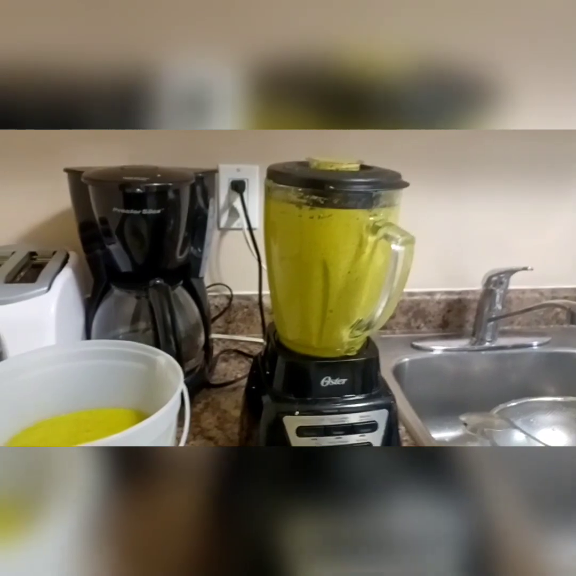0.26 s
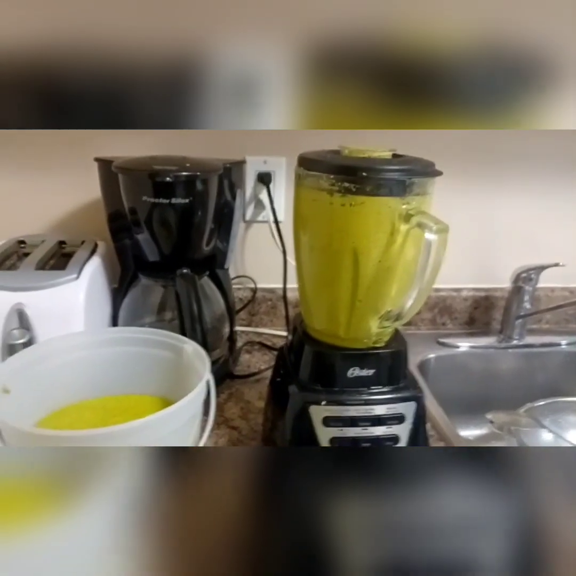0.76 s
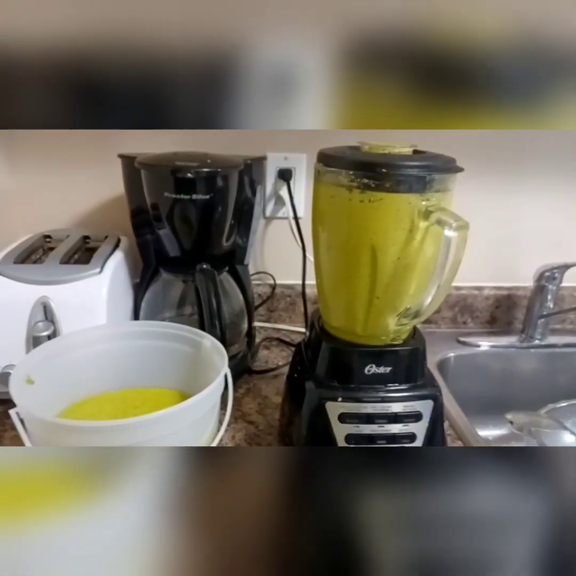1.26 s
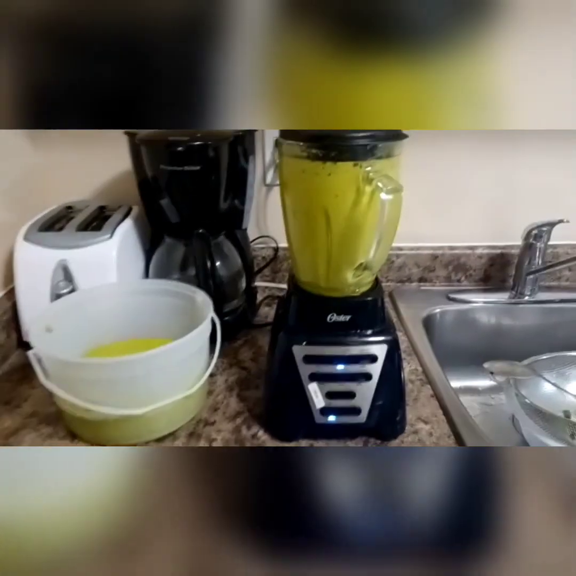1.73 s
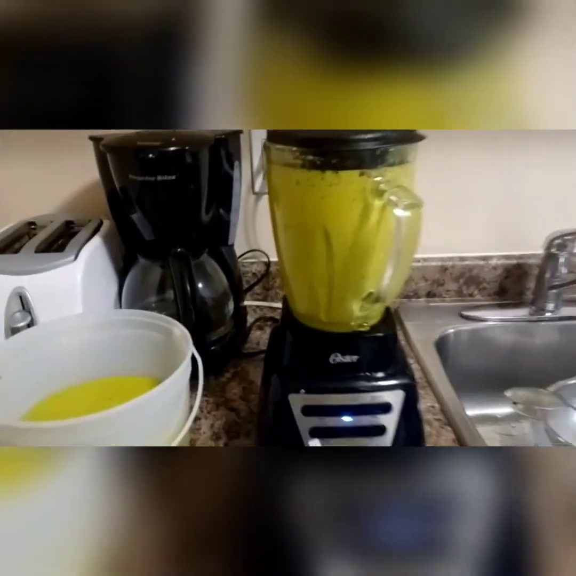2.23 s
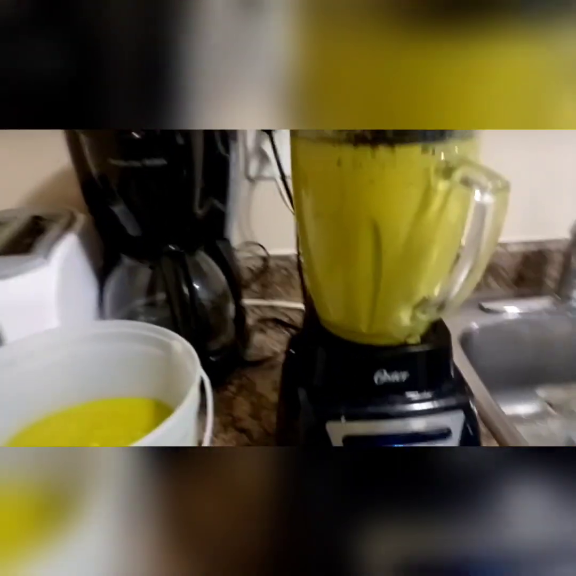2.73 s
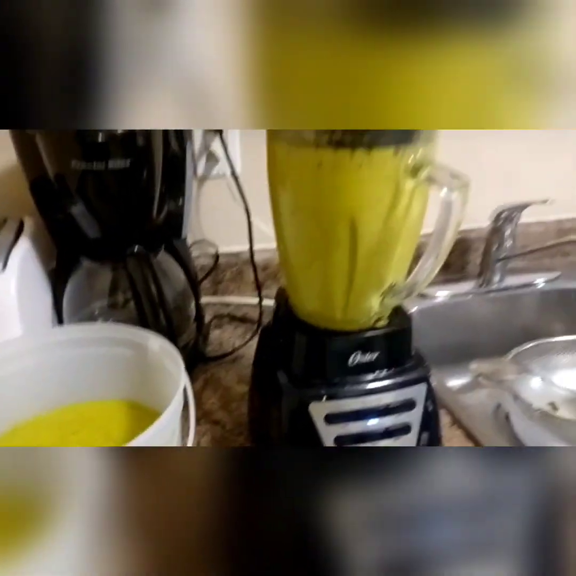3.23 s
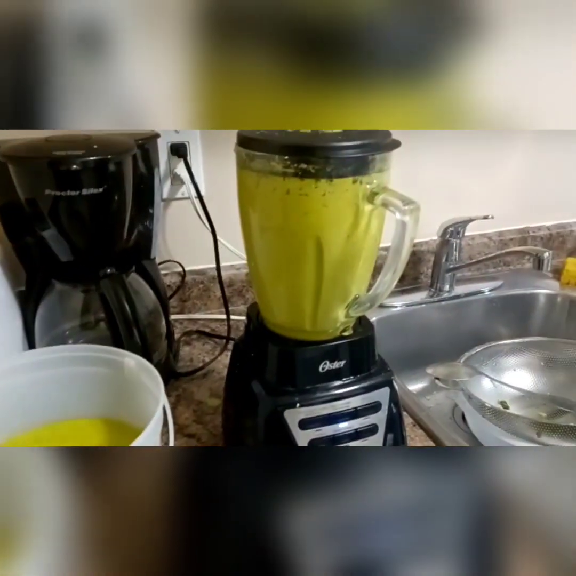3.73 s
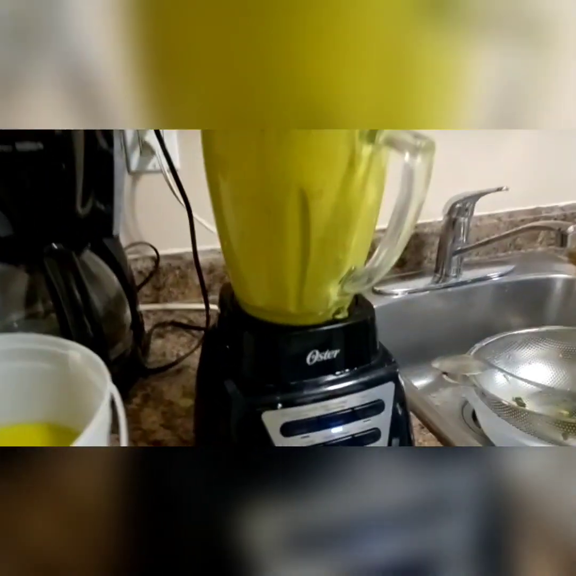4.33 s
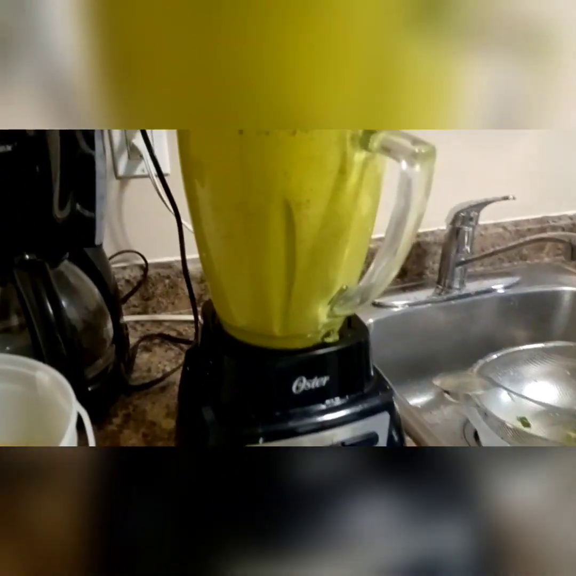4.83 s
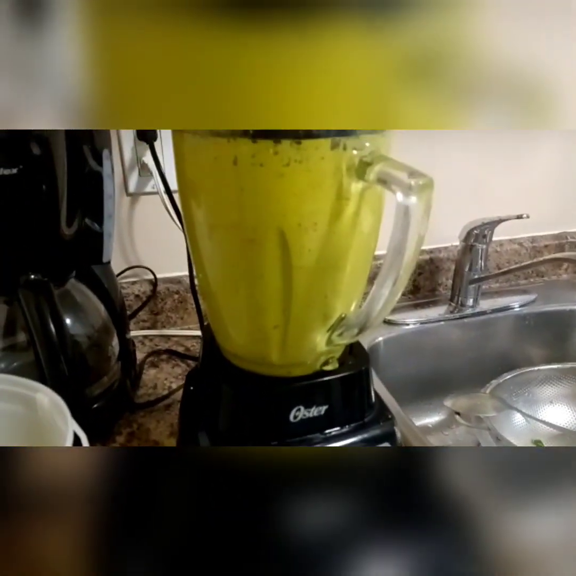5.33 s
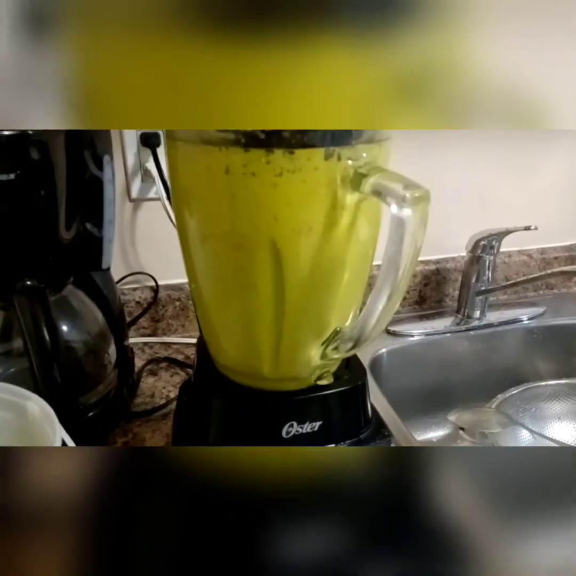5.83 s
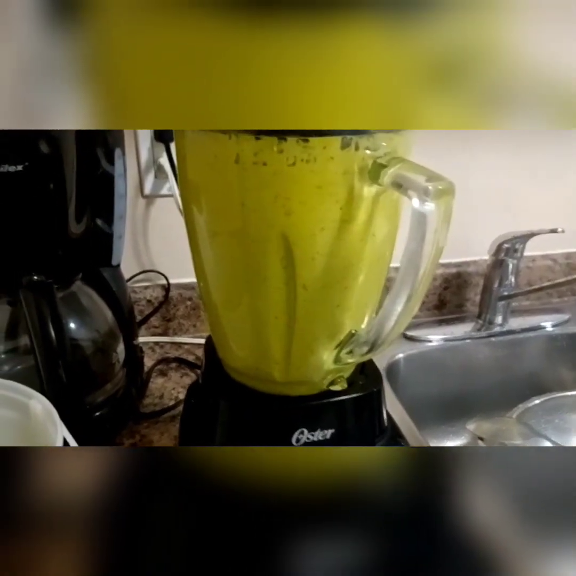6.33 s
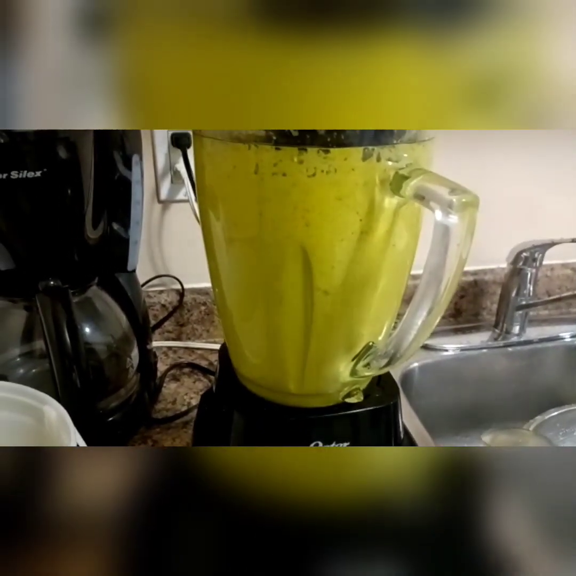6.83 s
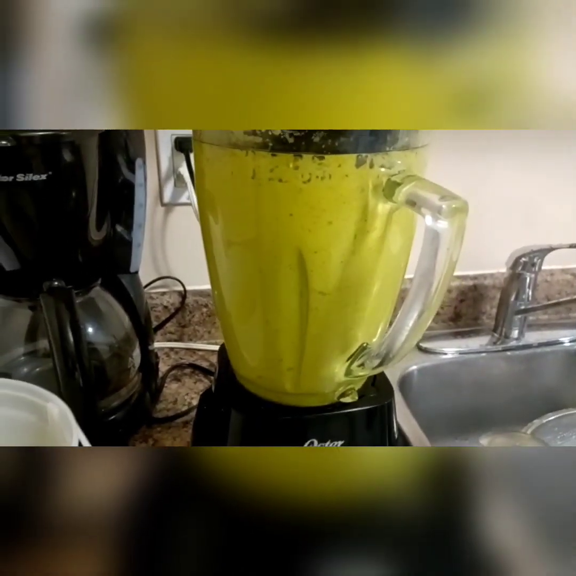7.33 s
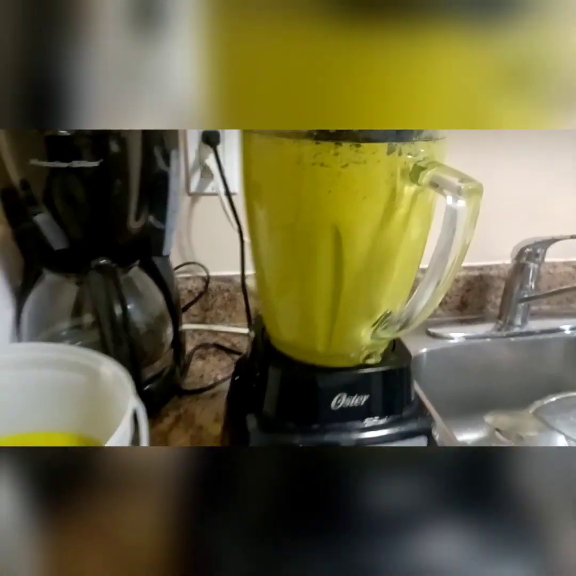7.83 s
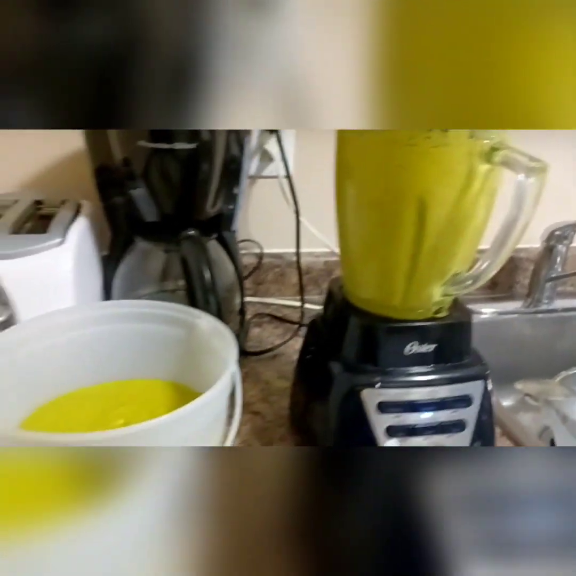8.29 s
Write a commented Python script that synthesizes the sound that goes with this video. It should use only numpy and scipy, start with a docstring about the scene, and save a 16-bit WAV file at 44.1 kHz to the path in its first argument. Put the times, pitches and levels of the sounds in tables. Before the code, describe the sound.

A blender, heard close in a home kitchen, runs in short bursts after a moment of faint appliance hum and a soft button tick. About once a second the motor spins up with an electric hum, a hissing whine and fast knocking, sloshes through thick puree, then winds down. Every other pulse runs faster. A few hard clacks and dull lump thumps come later, and the eighth pulse breaks off while spinning up.

```python
"""A quiet kitchen murmurs; a button ticks and a blender, heard close, starts on a jar of thick puree.
Power comes on: the motor field hums at twice the mains, the drive coupling chatters, then knocks once a turn.
As speed builds, the brushes hiss and whine and the blades thump through the puree, ringing the jar.
Power drops and the motor coasts down, at times with a thin squeak. Pulses follow a second apart, forward
and reverse in turn, with a few clacks and caught lumps later on; the eighth is cut short as it spins up."""
import sys
import numpy as np
from scipy import signal
from scipy.fft import rfft, irfft, next_fast_len
from scipy.io import wavfile
from scipy.ndimage import uniform_filter1d

SR = 44100
rng = np.random.default_rng(int(sys.argv[2]) if len(sys.argv) > 2 else 0)


def put_to_file(sound):
    """Save the sound as 16-bit audio at rate SR, in the file named by the first command-line argument."""
    columns = np.atleast_2d(sound).T  # one column per channel
    safe = np.clip(columns, -1, 1)
    whole_steps = np.round(safe * 32767)
    wavfile.write(sys.argv[1], SR, whole_steps.astype(np.int16))


N = 377363
T = np.arange(N) / SR
HUM_HZ = 120  # twice the mains: the rate of the torque ripple
CYCLE_START_S, CYCLE_S, COAST_S = 1.33, 1.0, .62  # the motor coasts from COAST_S into each cycle
SLACK_S = .008  # power comes on this long before the coupling chatters


def undb(db):
    """Gain of a dB value."""
    return 10 ** (np.asarray(db) / 20)


def unit(x):
    """Scale to rms 1."""
    return x / np.sqrt(np.mean(x ** 2))


def even(x, reverse):
    """Rms 1 in each direction of drive."""
    return x / np.where(reverse, x[..., reverse].std(), x[..., ~reverse].std())


def noise():
    """Two unrelated white noises, for mid and side."""
    return rng.standard_normal((2, N))


def walk(rate_hz):
    """Random modulator of rms 1, gliding to a new value rate_hz times a second."""
    k = int(SR / rate_hz)
    return unit(uniform_filter1d(np.repeat(rng.standard_normal(N // k + 1), k), k)[:N])


def colour(x, points):
    """EQ through (f/Hz, gain/dB) points."""
    hz, db = np.transpose(points)
    size = next_fast_len(N)
    gain = undb(np.interp(np.log(np.arange(size // 2 + 1) * SR / size + 1), np.log(hz), db))
    return irfft(rfft(x, size) * gain, size)[..., :N]


def ring(x, hz, width_hz):
    """One resonance, gain 1 at its centre."""
    return signal.lfilter(*signal.iirpeak(hz, hz / width_hz, SR), x)


def body(x, modes, reverse):
    """Resonator bank; each direction of drive weights the modes its own way."""
    return sum(ring(x, hz, width) * undb(np.where(reverse, back_db, fore_db)) * (-1) ** k
               for k, (hz, width, fore_db, back_db, *_) in enumerate(modes))


def burst(strikes, decay_s):
    """Every strike opens a decaying envelope."""
    return signal.lfilter([1], [1, -np.exp(-1 / (decay_s * SR))], strikes)


def triggers(count, scatter_db):
    """A strike of random size whenever the count crosses a whole number."""
    return np.append(0, np.diff(np.floor(count))) * undb(scatter_db * rng.standard_normal(N))


def hits(cues):
    """One impulse for each (t/s, level/dB) cue."""
    strikes = np.zeros(N)
    for s, db in cues:
        strikes[int(s * SR)] = undb(db)
    return strikes


# room tone spectrum: f/Hz, relative level/dB
ROOM_TONE = [(29, -18), (50, -2.5), (82, -10.5), (180, -5.5), (546, -17), (582, -26), (724, -18),
             (1090, -28.5), (9000, -47.5), (11700, -78), (19800, -120)]
# fridge compressor lines: f/Hz, level/dB
FRIDGE_LINES = [(59.2, -101), (118.4, -77.5), (177.6, -85.5), (236.9, -84)]
def kitchen(murmur_db=-70.5):
    """The bed: a low murmur of appliances and the drone of a fridge compressor."""
    murmur = unit(colour(noise(), ROOM_TONE)) * undb(murmur_db + 2 * walk(23))
    return murmur + sum(np.sqrt(2) * undb(db) * np.sin(2 * np.pi * hz * T) for hz, db in FRIDGE_LINES)


def button(at_s=1.28, decay_s=.004, hz=980, width_hz=1100):
    """One soft, dull tick as the button is pressed."""
    press = undb(-52) * (T > at_s) * np.exp(-np.abs(T - at_s) / decay_s)
    return ring(ring(press * noise(), hz, width_hz), hz, width_hz)


# shaft speed over a cycle: t/s, forward speed/(turns/s), reverse speed/(turns/s)
SPEED_CURVE = [(0, 12, 12), (.12, 40, 44), (.19, 48.5, 51), (.26, 55.5, 62), (.33, 56.3, 70.5),
               (.42, 54.3, 72.4), (.5, 52.8, 73.5), (.61, 51.8, 73.5), (.65, 47, 57), (.72, 38, 41),
               (1, 8, 12)]
def shaft_speed(cycle_t, reverse):
    """The motor spins up, holds and coasts; it runs faster in reverse."""
    at, fore, back = np.transpose(SPEED_CURVE)
    return np.where(reverse, np.interp(cycle_t, at, back), np.interp(cycle_t, at, fore))


# cue sheet, a row a pulse: chatter t/s, full hum/dB, soft-start hum/dB, hum dip t/s into the cycle,
# churn/dB, rattle/dB, rattle tail trim/dB, chatter drive/dB, chatter length/s, coupling seat/0-1,
# knock/dB re hiss, whine trim/dB, upper whine trim/dB, whistle/dB re rattle
PULSE_CUES = [(1.4034, -21, -28.5, 0.14, -31, -37.5, 24, -43, 0.019, 1, -6.5, 1, -5, -19),
              (2.334, -29, -30, 0.16, -25.5, -36, -1, -27, 0.055, 0, -3, 2.5, -1, -30),
              (3.3313, -21, -26.5, .12, -29.5, -37, 5, -22, 0.034, 0.47, -4, -3.5, 11, -14),
              (4.335, -26.5, -31, 0.21, -24.5, -35.5, 7, -33.5, 0.013, 0, -5, -4.5, .1, -25),
              (5.333, -18, -24.5, .1, -29.5, -36, -13, -21.5, 0.034, 1, -5.5, 3.5, -5, -18),
              (6.33, -27, -37.5, 0.23, -25, -36, -4.5, -22.5, 0.032, .35, -6.5, 2, -3, -26),
              (7.333, -18.5, -28, 0.052, -29, -37, -7, -35, 0.029, 0.5, -8.5, 3, -6, -16),
              (8.33, -37, -33, 0.23, -26, -40, -7, -32.5, 0.0085, .2, -2, 3, 4, -26)]
# envelopes over a cycle, one for each direction: t/s, hum trim/dB, churn trim/dB, rattle trim/dB
FORWARD_ENVELOPE = [(.02, -0.8, -10, -10.5), (.1, 0.5, -7.5, -7.5), (.26, 0.7, 0.64, 0.06),
                    (0.599, 0.1, -3, -2.05), (.68, -19.5, -12.5, -10.5), (.86, -43.5, -36.5, -34),
                    (1, -53, -52, -50.5)]
REVERSE_ENVELOPE = [(.02, -1.5, -19, -10.5), (.07, -1.8, -13.5, -13.5), (.2, -1, -7.5, -4),
                    (.33, -1.2, 0.3, -0.36), (.59, -1, -0.1, -1.6), (.68, -13.5, -8, -9),
                    (.8, -24, -21.5, -16.5), (.96, -40, -45, -32.5), (1, -31, -37, -34)]
def faders(pulse, cycle_t, reverse, attacks_s=(.025, .011, .0047)):
    """Hum, churn and rattle levels in dB: every pulse swells, holds and dies away."""
    chatter_s, full_db, soft_db, dip_s, churn_db, rattle_db, tail_db = np.array(PULSE_CUES)[pulse, :7].T
    soft_start = np.interp(cycle_t, (.11, .28), (0, 1))
    # the hum dips as the blades gather speed
    dip_db = np.where(reverse, -17.5, -2.5) * np.exp(-((cycle_t - dip_s) / .03) ** 2)
    hum_db = soft_db + (full_db - soft_db) * soft_start + dip_db
    rattle_db = rattle_db + tail_db * np.interp(cycle_t, (.9, 1), (0, 1))
    powered_s = np.maximum(T + SLACK_S - chatter_s, 0)
    fore_t, *fores = np.transpose(FORWARD_ENVELOPE)
    back_t, *backs = np.transpose(REVERSE_ENVELOPE)
    levels = []
    for db, fore, back, attack_s in zip((hum_db, churn_db, rattle_db), fores, backs, attacks_s):
        shape_db = np.where(reverse, np.interp(cycle_t, back_t, back), np.interp(cycle_t, fore_t, fore))
        onset_db = 20 * np.log10(1e-5 + 1 - np.exp(-(powered_s / attack_s) ** 2))
        levels.append(db + shape_db + onset_db)
    return levels


# hum overtones: multiple of HUM_HZ, level/dB re churn
HUM_OVERTONES = [(2, -10), (3, -20.5), (4, -38), (5, -13.5)]
def field_hum(hum_db, churn_db, turns, reverse):
    """The motor field hums at twice the mains, wavering more in reverse."""
    phase = 2 * np.pi * HUM_HZ * T
    waver_db = np.where(reverse, 2, .6) * walk(25)
    root = np.sqrt(2) * undb(hum_db + waver_db) * np.sin(phase + .013 * np.sin(2 * np.pi * turns))
    overtones = sum(undb(db + 4.1 * walk(15)) * np.sin(k * phase + k) for k, db in HUM_OVERTONES)
    return root + undb(churn_db) * overtones


def unbalance(turns, speed, reverse):
    """The unbalanced shaft throbs with a force that grows with the square of speed."""
    root = undb(np.where(reverse, -11, -14)) * np.sin(2 * np.pi * turns)
    octave = undb(np.where(reverse, -16, -4) + 5.5 * walk(20)) * np.sin(4 * np.pi * turns)
    return (speed / 70) ** 2 * (root + octave)


# coupling and housing modes: f/Hz, width/Hz, forward hiss/dB, reverse hiss/dB,
# knock on seat 0/dB, knock on seat 1/dB
HOUSING_MODES = [(1415, 75, -11, 0.5, -25, -24), (1913, 360, -4.5, -1, -20, -14),
                 (2185, 205, 0, 2.5, -2, -0.5), (2640, 730, -9.5, -5.5, -15, -20),
                 (3660, 460, -6, -3, -8, -10.5), (4116, 410, -7, -4, -4, -6),
                 (4820, 317, -7.5, -3, -2.5, -2.5), (5270, 154, -5, -2.5, -13.5, -3),
                 (6050, 460, -9, -8.5, -17, -15), (7220, 280, -13.5, -13, -42, -17),
                 (7630, 180, -20, -18, -34, -30), (11560, 340, -20, -22.5, -28, -39),
                 (12340, 130, -9.5, -9.5, -20, -27), (12930, 4900, -22.5, -20.5, -28, -35)]
def coupling_hit(strikes, seat=0):
    """A sharp blow and a short scrape ring the coupling; how it is seated sets the tone."""
    blow = np.array([strikes, np.roll(strikes, shift=17)])  # second path a little longer
    contact = blow + .09 * burst(strikes, decay_s=.003) * noise()
    return sum(ring(ring(contact, hz, 2 * width), hz, width) * undb(db0 + (db1 - db0) * seat)
               for hz, width, _, _, db0, db1 in HOUSING_MODES)


def chatter(gain_db=28):
    """At switch-on the torque ripple drums a short, fading roll on the coupling."""
    strikes = np.zeros(N)
    roll_t = np.arange(0, .08, 1 / HUM_HZ)
    for s, db, length_s in np.array(PULSE_CUES)[:, [0, 7, 8]]:
        strikes[((s + roll_t) * SR).astype(int)] += undb(db) / (1 + (roll_t / length_s) ** 6)
    return undb(gain_db) * coupling_hit(strikes)


def rattle(turns, reverse, knock_db, seat):
    """The coupling knocks once a turn and the brushes hiss, both harder as the torque ripple peaks."""
    torque = np.cos(2 * np.pi * HUM_HZ * T)
    blows = triggers(turns + .02 * walk(70), scatter_db=1.5)
    knock = coupling_hit(blows * undb(np.where(reverse, 2.5, .8) * torque), seat)
    hiss = body(undb(.96 * torque + 2.1 * walk(50)) * noise(), HOUSING_MODES, reverse)
    return even(hiss, reverse) + undb(knock_db) * even(knock, reverse)


# commutator partials: multiple of shaft speed, forward weight/dB, reverse weight/dB
WHINE_PARTIALS = [(35.8, -11.5, -12.5), (111.5, -21, -21)]
# motor shell modes: f/Hz, width/Hz, gain/dB
SHELL_MODES = [(1890, 110, 1.5), (2645, 55, 7.5), (6340, 300, -6.5)]
def whine(turns, reverse, coasting, upper_db):
    """Brushes crossing the commutator bars sing with the speed, loudest through the shell modes."""
    phase = 2 * np.pi * (turns + .0052 * np.cumsum(walk(60)) / SR)
    # uneven bar contact spreads each line into a breathy band, more so in the run-down
    rough = 1 + np.where(coasting, 2.2, .2) * walk(250)
    trims_db = 0, np.where(coasting, -12, upper_db)
    bars = 0
    for (k, fore_db, back_db), trim_db in zip(WHINE_PARTIALS, trims_db):
        level_db = np.where(reverse, back_db, fore_db) + trim_db + 3.4 * walk(12)
        bars = bars + rough * undb(level_db) * np.sin(k * phase)
    return .67 * bars + sum(undb(db) * ring(bars, hz, width) for hz, width, db in SHELL_MODES)


def whistle(turns):
    """A high, breathy whistle throbs with each turn."""
    return unit(ring(noise(), hz=7880, width_hz=130)) * undb(2.7 * np.cos(2 * np.pi * turns))


# jar and base modes: f/Hz, width/Hz, forward gain/dB, reverse gain/dB
JAR_MODES = [(168.3, 33, -3.5, -8.5), (227.1, 22, 0, -3), (299.7, 38.5, 0, 0.2), (337, 25.8, 3.5, 5.5),
             (379, 46, -7.5, -4.5), (479.4, 42, -6, -4.5), (567.6, 32.6, -9, -9.5), (659, 65, -11, -12),
             (764.3, 34, -10, -11), (932, 47, -8.5, -10.5)]
def churn(turns, reverse):
    """Blades thump and slosh unevenly through the puree and ring the jar."""
    once_a_turn = triggers(turns, scatter_db=.67)
    blades = triggers(4 * turns + .3 * walk(60), scatter_db=4.9)
    thumps = .5 * (unit(once_a_turn) + unit(blades)) * [[1], [0]]  # mid only
    slosh = 1.29 * undb(1.86 * walk(40)) * noise()
    return even(body(thumps + slosh, JAR_MODES, reverse), reverse)


# spectrum of the rush: f/Hz, relative level/dB
RUSH_SPECTRUM = [(82, 0.5), (140, 3), (334, -19.5), (407, -22), (581, -10.5), (1230, -13.5), (2190, -12),
                 (2940, -24), (4920, -26.5), (15800, -53)]
def rush(churn_db, rattle_db):
    """A broad, fluttering rush fills in between the rings, following both puree and motor."""
    return unit(colour(noise(), RUSH_SPECTRUM)) * undb(.5 * (churn_db + rattle_db) - 2 + 1.35 * walk(30))


# squeaks while coasting: t/s, length/s, f/Hz, level/dB
SQUEAK_CUES = [(1.944, 0.21, 3260, -60), (5.1, 0.16, 7150, -65), (5.1, 0.2, 5250, -63),
               (5.09, .05, 2700, -53), (5.945, 0.17, 6550, -60), (6.14, 0.18, 6820, -79)]
def squeaks():
    """Thin rubbing tones that set in quickly and fade."""
    out = 0
    for s, length_s, hz, db in SQUEAK_CUES:
        swell = np.sin(np.pi * np.sqrt(np.clip((T - s) / length_s, 0, 1)))
        out = out + undb(db) * swell * unit(ring(rng.standard_normal(N), hz, width_hz=30))
    return out


# lone clacks: t/s, drive level/dB
CLACK_CUES = [(4.6021, -20), (4.66, -23), (5.1, -37), (7.009, -33)]
def clacks(gain_db=28):
    """Single hard hits on the coupling."""
    return undb(gain_db) * coupling_hit(hits(CLACK_CUES))


# caught lumps: t/s, drive level/dB
LUMP_CUES = [(5.437, -22), (6.427, -25.5)]
def lumps(reverse, gain_db=16):
    """The blades catch a lump as they gather speed: a dull thump through the jar."""
    thumps = body(burst(hits(LUMP_CUES), decay_s=.0009), JAR_MODES, reverse)
    return undb(gain_db) * thumps * np.array([[1], [.3]])  # mostly mid


def echoes(x, t60_s):
    """Dense reflections off counter and walls, energy kept."""
    tail = rng.standard_normal(SR // 2) * np.exp(-np.log(1000) * T[:SR // 2] / t60_s)
    return signal.fftconvolve(x, tail / np.linalg.norm(tail))[:N]


# stereo width: f/Hz, side gain/dB
SIDE_EQ = [(100, -21), (250, -18), (500, -9), (1000, -3.5), (4000, -1.5), (7000, -6.5), (12000, -8.5)]
# share of the mid that leans right: f/Hz, gain/dB
RIGHT_LEAN = [(300, -28), (1000, -21.5), (2200, -8), (5000, -16), (9000, -36)]
def stereo(shared, apart, tones):
    """Blender and room reach the phone's two microphones differently."""
    mid = tones + shared + undb(-8) * echoes(shared, t60_s=.23)
    spread = tones + apart + undb(-2) * echoes(apart, t60_s=.12)
    side = colour(spread, SIDE_EQ) - colour(mid, RIGHT_LEAN)
    return np.array([mid + side, mid - side])


def scene():
    """The cue sheet, shaft speed and faders play the blender's layers over the kitchen bed."""
    cues = np.array(PULSE_CUES)
    pulse = np.maximum(np.searchsorted(cues[:, 0], T + SLACK_S) - 1, 0)
    cycle_t = T - CYCLE_START_S - CYCLE_S * pulse
    reverse = pulse % 2 == 1
    speed = shaft_speed(cycle_t, reverse)
    turns = np.cumsum(speed) / SR
    hum_db, churn_db, rattle_db = faders(pulse, cycle_t, reverse)
    seat, knock_db, whine_db, upper_db, whistle_db = cues[pulse, -5:].T
    knock_db = knock_db - 10 * np.maximum(cycle_t - COAST_S, 0)  # unpowered, the knocks soften

    tones = field_hum(hum_db, churn_db, turns, reverse) + undb(churn_db) * unbalance(turns, speed, reverse)
    motor = rattle(turns, reverse, knock_db, seat)
    motor += undb(whine_db) * whine(turns, reverse, cycle_t > COAST_S, upper_db)
    motor += undb(whistle_db) * whistle(turns)
    treble = button() + chatter() + undb(rattle_db) * motor + squeaks() + clacks()
    jar = undb(churn_db) * churn(turns, reverse) + rush(churn_db, rattle_db) + lumps(reverse)
    # a small jar radiates no deep bass
    jar = signal.sosfilt(signal.butter(4, 95, "high", fs=SR, output="sos"), jar)
    shared, apart = kitchen() + treble + jar
    return stereo(shared, apart, tones)


def record(dry):
    """The phone adds its own faint hiss, trims the deepest bass and cuts the top."""
    dry = dry + undb(-86.5) * unit(ring(noise(), hz=12300, width_hz=6000))
    dry = signal.sosfilt(signal.butter(4, 50, "high", fs=SR, output="sos"), dry)
    return signal.sosfilt(signal.ellip(12, .2, 90, 15800, fs=SR, output="sos"), dry)


dry = scene()
out = record(dry)
put_to_file(out)
```